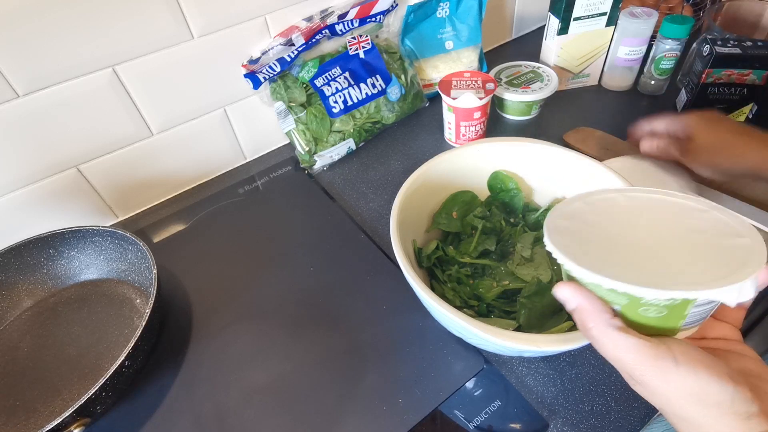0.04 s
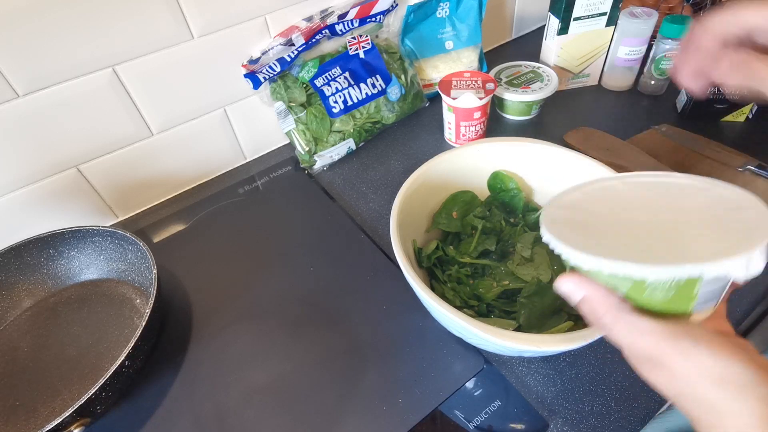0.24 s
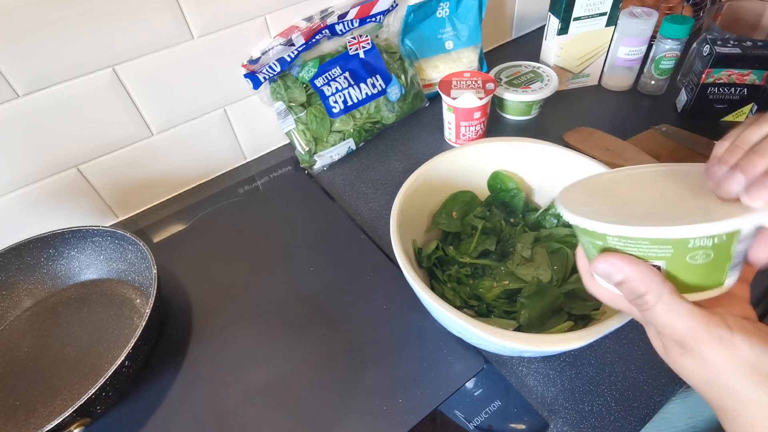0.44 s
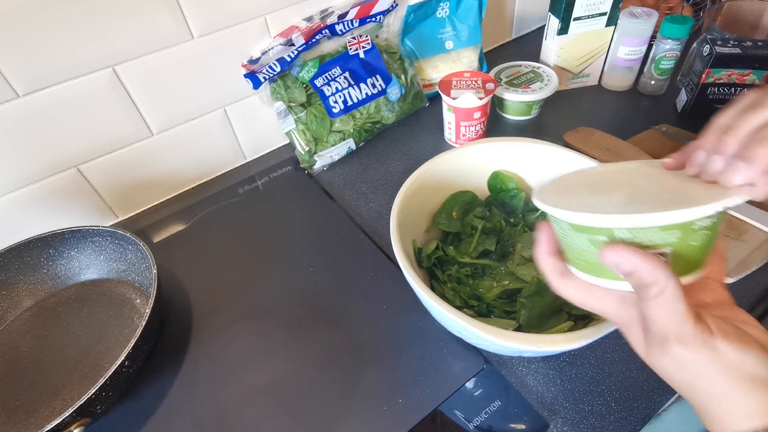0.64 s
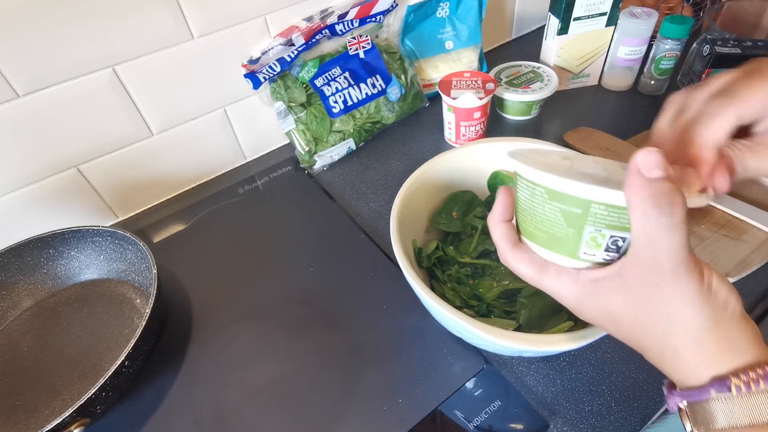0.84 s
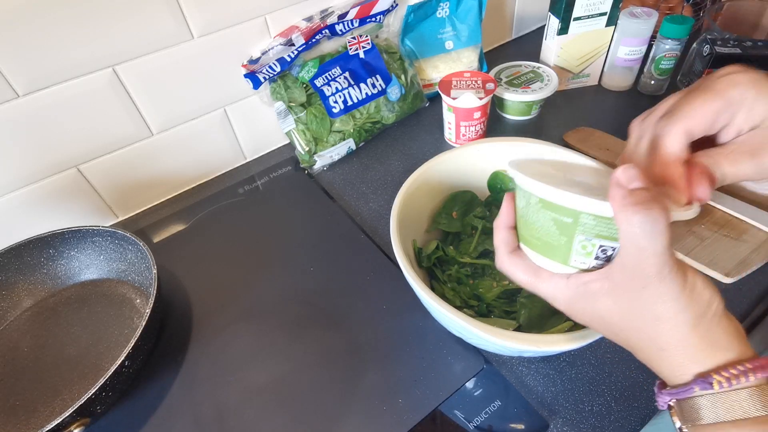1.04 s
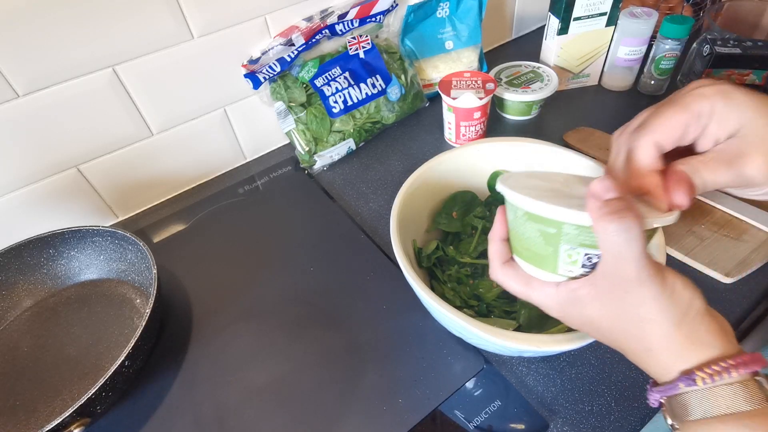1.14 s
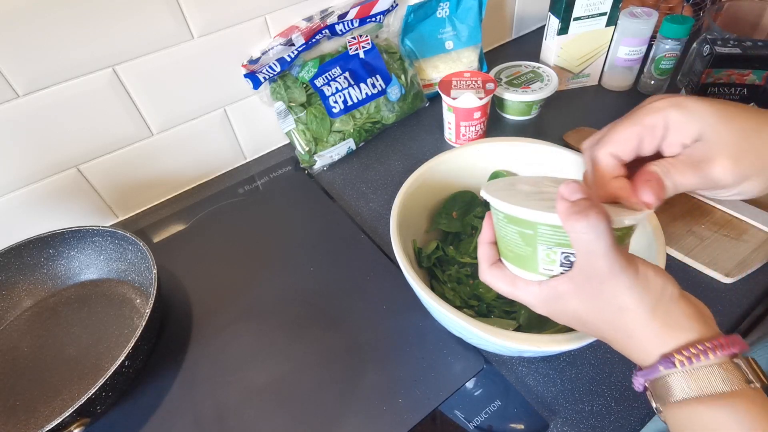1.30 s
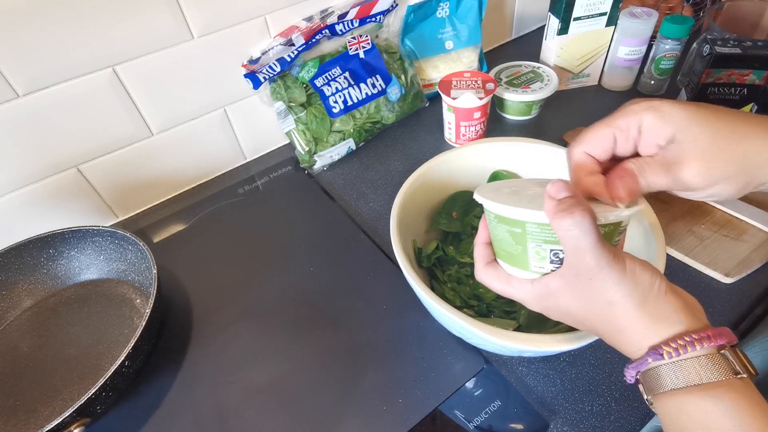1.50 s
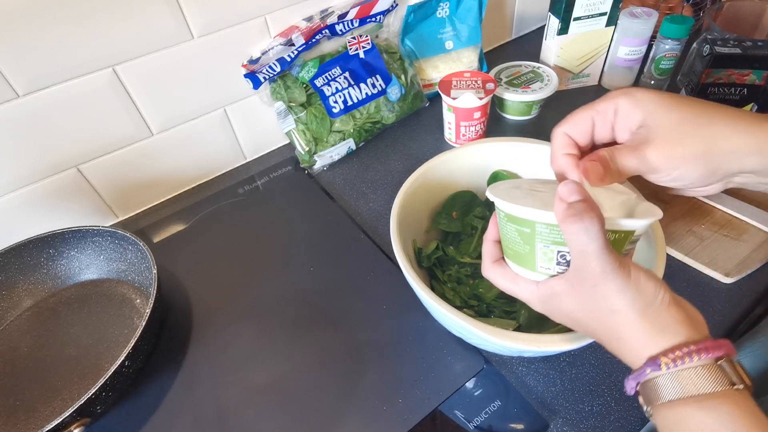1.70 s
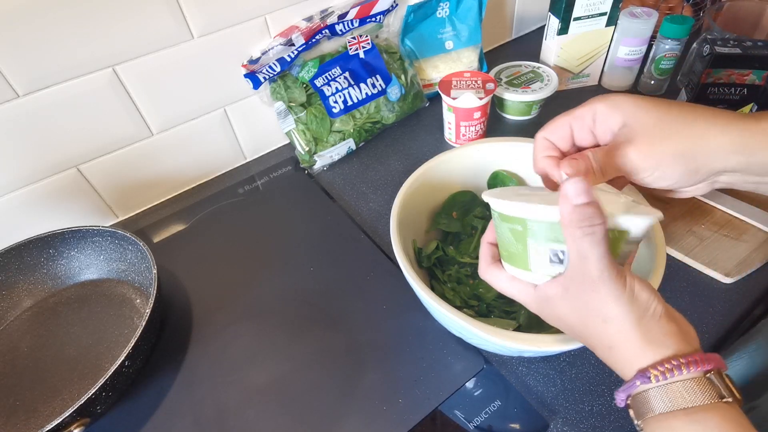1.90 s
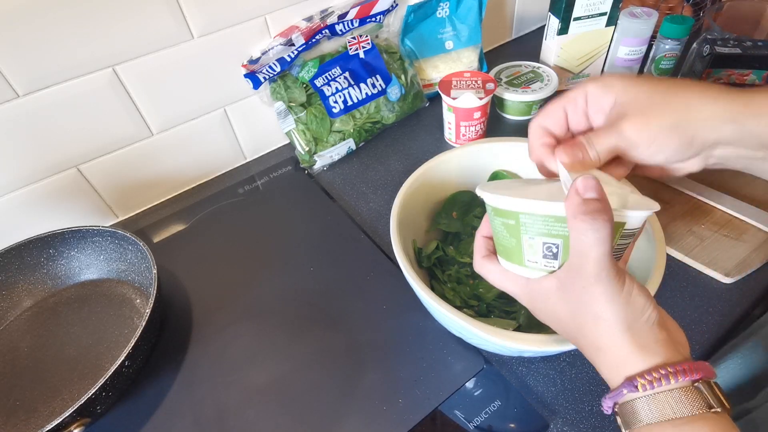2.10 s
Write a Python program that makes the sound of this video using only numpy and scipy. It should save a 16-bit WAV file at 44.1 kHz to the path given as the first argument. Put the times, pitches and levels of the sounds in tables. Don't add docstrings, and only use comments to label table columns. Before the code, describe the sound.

Close, crisp plastic tub handling: quick lid clatter with a low board thud first, then sparse sharp film snaps, rim clicks and hollow taps, each ringing briefly in a small tiled kitchen over soft room hush and fridge hum.

```python
import sys
import numpy as np
from scipy import signal
from scipy.io import wavfile
from scipy.ndimage import uniform_filter1d

SR = 44100
rng = np.random.default_rng(int(sys.argv[2]) if len(sys.argv) > 2 else 0)


def store_pcm(level_fs):
    pcm = np.round(np.clip(level_fs, -1, 1) * 32767).astype(np.int16)
    wavfile.write(sys.argv[1], SR, np.atleast_2d(pcm).T)


def gain_from_db(level_db):
    decades = np.asarray(level_db, float) / 20
    return 10 ** decades


N = 94815


def evened(x):
    return x / np.sqrt(np.mean(x ** 2) + 1e-20)


def read(points, hz):
    f, value = np.transpose(points)
    return np.interp(np.log(hz + 1), np.log(f + 1), value)


def add(mix, s, sound):
    part = mix[:, round(s * SR):][:, :sound.shape[-1]]
    part += sound[..., :part.shape[1]]


def partly_like(a, b, same):
    return same * a + np.sqrt(1 - same ** 2) * b


def causal(gain):
    spectrum = np.exp(np.conj(signal.hilbert(np.log(gain + 1e-5))))
    return np.fft.ifft(spectrum).real[..., :512]


def humps(peaks, scale=1):
    hz = abs(np.fft.fftfreq(1024, 1 / SR))
    power = sum((gain_from_db(db) / (1 + (2 * (hz - f * scale) / width) ** 2)) ** 2 for f, width, db in peaks)
    gain = np.sqrt(power)
    return gain / gain.mean()


def ring(x, hz, width):
    b, a = signal.iirpeak(hz, hz / width, SR)
    return signal.lfilter(b, a, signal.lfilter(b, a, x))


def body(x, peaks):
    return sum((-1) ** k * gain_from_db(db) * ring(x, hz, width) for k, (hz, width, db) in enumerate(peaks))


RISE_S = 0.0008


def burst(t60):
    fray_db, same_click = -15, 0.071
    t = np.arange(1500) / SR - RISE_S
    left, other = rng.standard_normal((2, 1500))
    fray = np.array([left, partly_like(left, other, same_click)])
    fray *= gain_from_db(fray_db - 60 * abs(t) / t60)
    return fray + np.sign(left[0]) * np.sinc(t * SR)


# pitch in Hz, width in Hz, level in dB.
FIZZ = [(9740, 2300, -2.5), (12470, 7000, -7.4), (14700, 6700, -12)]
# pitch in Hz, width in Hz, level in dB.
RIM = [(4640, 3100, -7), (5560, 1880, 2.5), (6480, 3600, -1)]


def breaks(rows, lifts_db, t60, wall):
    out = np.zeros((3, N))
    clean = np.sinc(np.arange(1500) - RISE_S * SR)
    for s, fizz_db, rim_db, wall_db, *rim_hz in rows:
        rim_scale = rim_hz[0] / RIM[1][0] if rim_hz else 1
        parts = humps(FIZZ), humps(RIM, rim_scale), humps(wall)
        levels_db = fizz_db, rim_db, wall_db
        power = sum((gain_from_db(db + lift) * part) ** 2 for db, lift, part in zip(levels_db, lifts_db, parts))
        colour = causal(np.sqrt(power))
        add(out, s, signal.fftconvolve(np.vstack([burst(t60), clean]), colour[None], axes=1))
    return out


# start in seconds, film fizz peak in dB, rim click in dB, wall tap in dB.
SNAPS = [(.0408, -62, -92, -100), (.0792, -59, -83, -85), (.0965, -60, -68, -72), (.5696, -61, -65, -83),
         (.594, -53, -59, -71), (.6035, -46, -57, -72), (.9075, -38, -55.5, -63), (.9137, -39, -50.5, -65),
         (.9305, -41, -59, -69), (.9565, -40.5, -55, -61), (1.0135, -53, -56, -56), (1.1228, -57, -86, -90),
         (1.1811, -52.5, -65, -69), (1.294, -45, -57, -71), (1.517, -45, -62, -79), (1.5653, -48, -70, -76),
         (1.568, -41.5, -60.5, -75), (1.595, -37, -58, -68), (1.6095, -38, -73, -62),
         (1.6245, -40, -52, -60), (1.6405, -47, -68, -57), (1.657, -36, -59, -47.5),
         (1.668, -47, -61, -47.5), (1.715, -48, -63, -49.5), (1.7311, -37, -52.5, -66),
         (1.693, -55, -55, -50), (1.719, -48, -51.5, -71), (1.511, -45, -75, -82)]
# start in seconds, film fizz peak in dB, rim click in dB, wall tap in dB,
# rim pitch in Hz.
CRACKS = [
    (0.6084, -25.5, -37.5, -56, 5610),
    (0.9725, -23.5, -37, -48, 4650),
    (1.4237, -45.5, -46.5, -73, 5500),
    (1.4261, -54, -43.5, -68, 6600),
    (1.65, -30, -45, -41, 4800),
    (1.8414, -19.5, -35, -47.5, 5920),
    (1.8445, -25.5, -51.5, -72, 6300),
    (2.0447, -38.5, -38, -48, 6400),
]
# pitch in Hz, width in Hz, level in dB.
WALL = [(1343, 650, -5.5), (2180, 940, -3.5), (2930, 4220, -4.5)]


def film_snaps():
    return breaks(SNAPS + CRACKS, lifts_db=[2, 11.5, 16], t60=0.004, wall=WALL)


# start in seconds, fizz peak in dB, rim click in dB, wall tap in dB,
# rim pitch in Hz.
LID = [
    (.2, -35, -42, -44, 5600),
    (.2025, -31, -36.5, -41.5, 6800),
    (.2075, -38, -38.5, -47.5, 4300),
    (.216, -50, -38.5, -54, 4500),
    (.2245, -25.5, -25.5, -44, 4670),
    (.232, -32, -46, -44, 5840),
    (.308, -43.5, -38, -44, 4250),
    (.318, -65, -42.5, -50, 5600),
]
# pitch in Hz, width in Hz, level in dB.
LID_SHEET = [(1780, 150, -17), (2200, 650, -2), (3120, 1970, -8)]


def lid_bounces():
    return breaks(LID, lifts_db=[4, 11.5, 14], t60=0.005, wall=LID_SHEET)


# start in seconds, peak in dB, pitch in Hz,
# time to fade by 60 dB in seconds.
KNOCKS = [(.2005, -36, 1120, .015), (.2068, -34, 485, 0.017), (.207, -44, 1270, 0.035),
          (.205, -36.5, 1780, 0.066), (.217, -39, 1810, .03), (.229, -37, 2100, 0.036),
          (.233, -29, 2190, .025), (.3085, -36, 2330, .012), (.314, -43, 1880, 0.014),
          (.323, -39, 2320, 0.016), (.356, -43, 2080, 0.021), (.365, -44, 1900, .018),
          (.381, -47, 1950, 0.016), (.387, -40, 2300, 0.014), (.4, -41, 2000, 0.027),
          (.5035, -45.5, 1500, 0.0071), (.516, -51.5, 1090, 0.014), (.908, -54, 800, .016),
          (.9545, -43, 1445, .02), (.958, -49.5, 830, 0.038), (.973, -43, 770, 0.011),
          (.9735, -44, 2230, 0.011), (1.0001, -28, 940, 0.017), (1.005, -38, 1100, .015),
          (1.011, -42, 930, 0.013), (1.017, -50, 1010, 0.012), (1.038, -51, 940, .02),
          (1.255, -54, 750, .016), (1.278, -50.5, 760, 0.02), (1.294, -47.5, 1080, 0.014),
          (1.562, -54, 735, .02), (1.574, -51.5, 760, 0.024), (1.594, -53, 820, 0.022),
          (1.623, -36, 1340, 0.015), (1.629, -36, 1150, 0.031), (1.6503, -25.5, 1180, 0.0051),
          (1.658, -33, 2250, 0.02), (1.659, -36, 1210, .016), (1.668, -39, 1240, 0.016),
          (1.669, -46, 2300, .012), (1.687, -35.5, 1250, 0.017), (1.6918, -31, 2280, 0.018),
          (1.698, -37, 1190, 0.017), (1.719, -40, 1470, 0.021), (1.76, -41.5, 980, 0.011),
          (1.841, -38.5, 1420, 0.047), (1.924, -40.5, 1200, 0.0079), (2.0448, -27.5, 1890, 0.012),
          (2.061, -52, 1980, 0.013),
          (0.25, -25, 4750, 0.0026),
    (.6083, -23.5, 5700, 0.0091),
    (.9733, -37, 5900, .004),
    (2.3, -27, 5300, 0.0056),
    (1.8415, -40, 2600, 0.012),
    (1.8415, -49.5, 970, 0.029),
    (.205, -40, 660, .03),
    (.2075, -35, 323, 0.051),
    (.2185, -37, 2900, 0.027),
]


def knocks():
    out, t = np.zeros((2, N)), np.arange(2000) / SR
    lift_db, attack_s = -2, 0.00076
    for s, db, hz, t60 in KNOCKS:
        tone = np.sin(2 * np.pi * hz * t) + 0.26 * np.sin(2 * np.pi * 0.91 * hz * t)
        envelope = gain_from_db(db + lift_db - 60 * t / t60) * (1 - np.exp(-t / attack_s))
        add(out, s, envelope * tone)
    return out


# start in seconds, length in seconds, level in dB,
# brightness in dB.
RUBS = [(0.1995, 0.041, -39, -7), (1.743, 0.057, -72.5, 9), (0.906, 0.047, -66, 10.5),
        (1.424, 0.065, -58, 2.5), (1.595, 0.057, -60, 1.5), (1.619, 0.078, -53, -4.5),
        (1.652, 0.066, -55.5, -1.5), (1.9, 0.056, -70.5, -9), (2.1, 0.091, -63, -10), (.33, 0.097, -57, -6),
        (.76, 0.16, -73, -3)]


def rubs():
    slips_per_s, spread_db = 5000, 5
    out = np.zeros((2, N))
    for s, length, db, bright_db in RUBS:
        chance, side, size = rng.random((8000, 3)).T
        progress = np.minimum(np.arange(8000) / SR / length, 1)
        slips = (chance < slips_per_s / SR) * np.sign(side - 0.5)
        slips = slips * gain_from_db(-spread_db * np.log(size + 0.016))
        slips = evened(slips) * np.sin(np.pi * progress ** 0.41)
        dull = body(slips, WALL + BOARD[2:])
        bright = gain_from_db(bright_db) * body(slips, RIM + FIZZ)
        add(out, s, gain_from_db(db + 8) * (dull + bright))
    return out


# pitch in Hz, width in Hz, level in dB.
BOARD = [(277, 81, 9.5), (490, 410, 0), (747, 190, -22), (1146, 540, -16.5)]
# start in seconds, peak in dB.
THUDS = [
    (.201, -51),
    (0.2066, -37),
    (0.211, -50.5),
]


def thuds():
    out, part = np.zeros((2, N)), body(np.sinc(np.arange(3000.)), BOARD)
    for s, db in THUDS:
        add(out, s, gain_from_db(db) * part / abs(part).max())
    return out


# frequency in Hz, time to fade by 60 dB in seconds.
ROOM = [(300, 0.17), (1000, 0.37), (2200, 0.37), (5500, 0.37), (9000, 0.31), (15000, 0.24)]
# frequency in Hz, level in dB.
ROOM_COLOUR = [(200, -5), (1000, 1), (2200, -0.2), (5500, 2.04), (9000, 1), (15000, -4)]


def kitchen(x, wet_db):
    scatter_db, scatter_t60 = -14, 0.035
    hz, out = np.fft.rfftfreq(128, 1 / SR), np.zeros((2, N))
    half = SR // 2
    taps = np.zeros((3, 2, half))
    at = np.arange(42, half - 8, 8) + rng.integers(0, 8, (3, 2, (half - 43) // 8))
    np.put_along_axis(taps, at, rng.choice([-1., 1.], at.shape), 2)
    scatter = gain_from_db(2 * (scatter_db + 20.5 - 60 * np.arange(half) / SR / scatter_t60))
    taps *= np.sqrt(1 + scatter)
    _, t, z = signal.stft(taps, SR, nperseg=128)
    z[:, 1] = partly_like(z[:, 0], z[:, 1], read(HUSH_SAME, hz)[:, None])
    z = z * gain_from_db(read(ROOM_COLOUR, hz)[:, None] - 60 * t / read(ROOM, hz)[:, None])
    tails = signal.istft(z, SR, nperseg=128)[1]
    for k, tail in enumerate(tails / np.linalg.norm(tails[0, 0])):
        turn = np.sqrt(2 / 3) * np.cos(np.pi * (3.1 * np.arange(N) / SR + k / 3))
        out += gain_from_db(wet_db) * signal.fftconvolve((x * turn)[None], tail, axes=1)[:, :N]
    return out


# frequency in Hz, level in dB.
LEFT_MIC = [(300, 1.5), (2000, 4), (4000, 2), (6000, 2.5), (8000, 4), (11000, -7), (13000, -2),
            (16000, -27)]
# frequency in Hz, level in dB.
RIGHT_MIC = [(300, 1.3), (2000, 5), (4000, -1.5), (6000, 2), (7800, -2.5), (9500, -3.5), (11000, 7.5),
             (16000, 12.5)]


def microphones(x):
    hz = abs(np.fft.fftfreq(1024, 1 / SR))
    colours = gain_from_db([read(LEFT_MIC, hz), read(RIGHT_MIC, hz)])
    return signal.fftconvolve(x, causal(colours), axes=1)[:, :N]


# frequency in Hz, level in dB per Hz.
HUSH = [(28, -6.5), (75, -8.5), (200, -11), (420, -14), (850, -24), (6500, -34), (8300, -41),
        (16000, -32.5)]
# frequency in Hz, likeness from 0 to 1.
HUSH_SAME = [(60, 1), (290, 1), (640, 0.24), (1400, 0.026)]
# frequency in Hz, left minus right in dB.
HUSH_LEAN = [(60, -16), (200, 9.5), (400, -0.5), (4400, 1.5), (8000, 3), (11000, -7), (13000, -5),
             (16000, -34)]


def hush():
    level_db, patch_db = -63, 0.5
    frames, hz = N // 256 + 5, np.fft.rfftfreq(1024, 1 / SR)
    a, b, c, d, patches = rng.standard_normal((frames, 513, 5)).T
    patches = evened(uniform_filter1d(uniform_filter1d(patches, 12, 0), 12, 1))
    left = a + 1j * b
    right = partly_like(left, c + 1j * d, read(HUSH_SAME, hz)[:, None])
    lean_db = np.minimum(read(HUSH_LEAN, hz) * np.array([[1], [-1]]), 0)
    colour_db = (read(HUSH, hz) + lean_db)[..., None] + patch_db * patches
    z = np.array([left, right]) * gain_from_db(colour_db)
    return gain_from_db(level_db) * evened(signal.istft(z, nperseg=1024, noverlap=768)[1][:, :N])


HUM_HZ = [49.5, 100, 143]
# rms level in dB, waver speed in Hz, waver depth.
HUM = [(-63, 6.5, .9), (-64.5, 16, 1.8), (-69, 22, 2.5)]


def fridge():
    lean_db = 7.8
    t, out = np.arange(N) / SR, 0
    speeds = np.linspace(-1, 1, 12) ** 3 + 0.0415
    for hz, (db, waver_hz, depth) in zip(HUM_HZ, HUM):
        drift = sum(np.exp(2j * np.pi * (waver_hz * f * t + rng.random())) for f in speeds)
        line = (1 + depth * drift / np.sqrt(12)) * np.exp(2j * np.pi * hz * t)
        out = out + gain_from_db(db) * evened(line.real)
    return out * gain_from_db([[lean_db / 2], [-lean_db / 2]])


def scene():
    direct_db, left_shade_db, left_lag_s = 2.5, -5, 0.00015
    film, lid = film_snaps(), lid_bounces()
    tub, board = knocks() + rubs(), thuds()
    sharp = (film + lid)[:2] * gain_from_db([[direct_db + left_shade_db], [direct_db]])
    direct = sharp + tub + board
    direct[0] = np.roll(direct[0], round(left_lag_s * SR))
    hands_room = kitchen(film[2] + gain_from_db(-9) * tub[1], wet_db=2)
    lid_room = kitchen(lid[2] + board[1], wet_db=3.5)
    return microphones(direct + hands_room + lid_room) + hush() + fridge()


def low_pass(x):
    return signal.sosfilt(signal.butter(12, 17150, fs=SR, output="sos"), x)


def record(dry):
    edge_hz = 15970
    mix = signal.oaconvolve(dry, signal.firwin(255, edge_hz, fs=SR)[None], "same")
    return low_pass(mix)


dry = scene()
out = record(dry)
store_pcm(out)
```